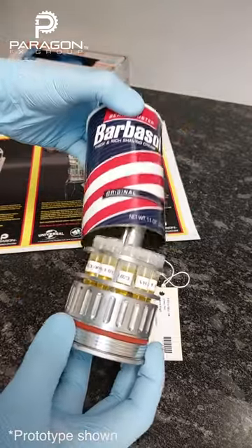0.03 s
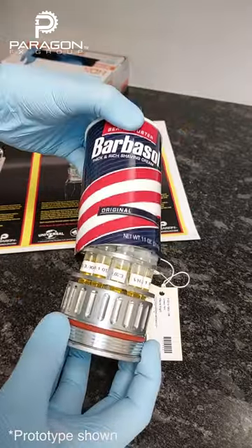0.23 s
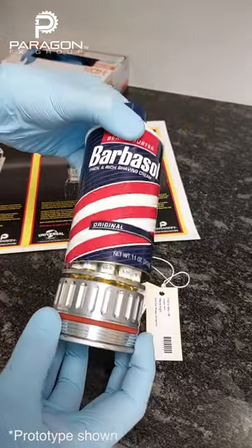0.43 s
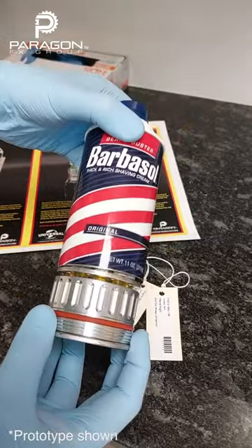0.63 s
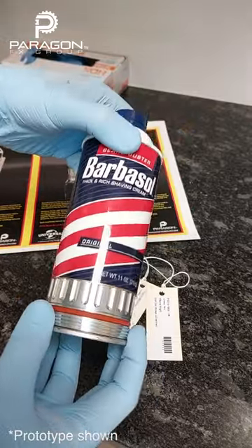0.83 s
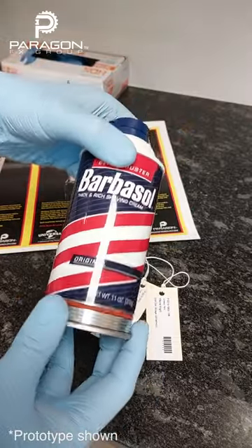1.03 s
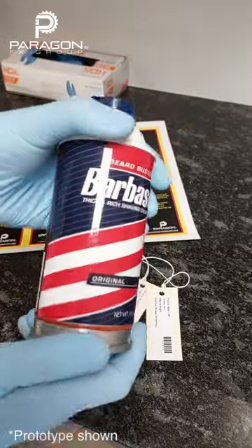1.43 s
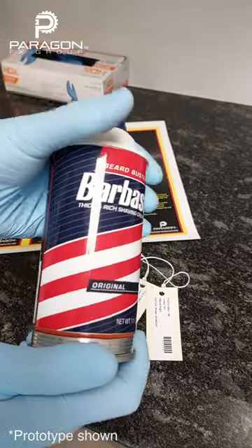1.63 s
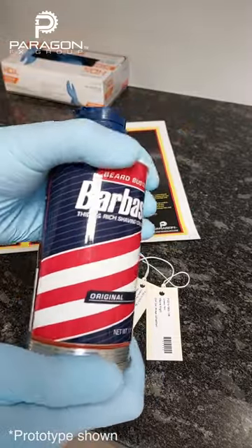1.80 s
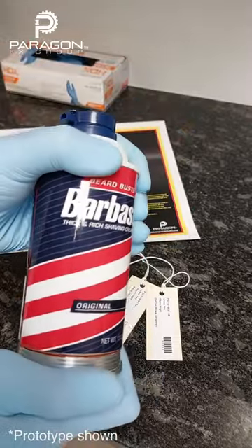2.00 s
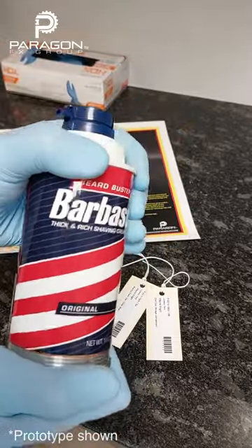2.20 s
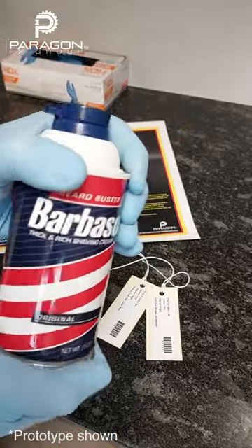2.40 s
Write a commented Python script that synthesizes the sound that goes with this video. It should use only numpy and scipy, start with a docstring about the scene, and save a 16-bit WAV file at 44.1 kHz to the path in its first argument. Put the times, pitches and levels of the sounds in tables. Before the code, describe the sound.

A thin can shell slides over a metal canister, with quick hollow knocks around 0.2 to 0.3 seconds, then light scrapes and sharp, briefly ringing clicks, strongest near 0.5 and 0.8. It seats with a click and soft thud at 1.1. Rubber gloves then rub and creak, most clearly around 1.4, sliding faintly until 2.5. Everything is close, over a small, quiet room's low hum.

```python
"""The rim of a thin can shell knocks and scrapes as gloved hands lower it over a metal canister.
Impact and friction excite the bending modes of the wall; the knocks also ring the enclosed air.
The shell seats with a soft thud, then the rubber gloves rub, creak and slide on it.
All is heard from close by, over the low hum of a small quiet room."""
import sys
import numpy as np
from scipy import signal
from scipy.fft import rfft, irfft, next_fast_len
from scipy.io import wavfile

SR = 44100
rng = np.random.default_rng(int(sys.argv[2]) if len(sys.argv) > 2 else 0)


def int16_out(signal):
    """Quantize to a 16-bit WAV file."""
    q = np.round(np.clip(np.atleast_2d(signal).T, -1, 1) * 32767)
    wavfile.write(sys.argv[1], SR, q.astype(np.int16))


N = 112454

# Bending modes of the wall. Each row: frequency in Hz, relative level in dB, T60 in seconds.
WALL_MODES = [(1753, -2, .12), (2603, -2, .13), (2666, -4, .13), (2755, -6, .1), (2972, -4, .09),
              (3555, -14, .11), (4190, -8, .1), (4410, -8, .08), (5030, -6, .08), (6086, -1, .07),
              (6195, 3, .07), (6352, -3, .07), (9700, -13, .08), (12300, -10, .07)]
# Spectrum of metal touching metal. Each row: frequency in Hz, gain in dB.
METAL_SPECTRUM = [(200, -4), (400, 4), (800, -5), (1400, 0.5), (2100, -0.5), (2650, -1), (3250, -9),
                  (3850, -10), (4400, 0.5), (5100, 9.5), (6200, 5), (7000, -3.5), (8300, -11), (9700, 0.5),
                  (12300, 5), (15500, -5)]


def undb(db):
    """Amplitude ratio of a level in decibels."""
    return 10 ** (np.asarray(db) / 20)


def unit(x):
    """Normalisation to an rms of 1."""
    return x / np.sqrt(np.mean(x ** 2))


def since(start):
    """Seconds elapsed since an onset, zero before it."""
    return np.maximum(np.arange(N) / SR - start, 0)


def band(x, lo, hi):
    """Butterworth band-pass between two frequencies in Hz."""
    return signal.sosfilt(signal.butter(3, [lo, min(hi, SR * .49)], "band", fs=SR, output="sos"), x)


def colour(x, points, power=1):
    """Minimum-phase filter through points of frequency in Hz and gain in dB."""
    size = next_fast_len(2 * N) * 2
    hz, db = np.array(points, float).T
    gain_db = np.interp(np.log(np.arange(size // 2 + 1) * SR / size + 1), np.log(hz), db) * power
    cepstrum = irfft(gain_db * np.log(10) / 20)
    cepstrum[1:size // 2] *= 2  # folding onto positive time makes the filter causal
    cepstrum[size // 2 + 1:] = 0
    return irfft(rfft(x, size) * np.exp(rfft(cepstrum)))[..., :N]


def noise():
    """A diffuse field at two points: coherent in the bass, independent in the treble."""
    mid, side = rfft(rng.standard_normal((2, N)))
    hz = np.arange(len(mid)) * SR / N
    coherence = 1 / (1 + (hz / 656) ** 2)
    spectra = mid * np.sqrt(1 + coherence) + side * np.sqrt(1 - coherence) * np.array([[1], [-1]])
    return irfft(spectra, N) / np.sqrt(2)


def wander(rate):
    """Random modulation of rms 1, interpolated between `rate` values a second."""
    return unit(np.interp(since(0) * rate, np.arange(N), rng.standard_normal(N)))


def ring(age, hz, t60):
    """Free vibration of a damped mode, falling 60 dB in t60 seconds."""
    return np.sin(2 * np.pi * hz * age) * np.exp(-np.log(1000) * age / t60)


def resonate(x, hz, width_hz):
    """Forced response of a resonator with unit gain at its centre."""
    return signal.lfilter(*signal.iirpeak(hz, hz / width_hz, fs=SR), x)


def textures(spectrum):
    """Densely overlapping modes act as coloured noise, here split into four bands."""
    # Low, middle, bright and top band. Each row: lower and upper edge in Hz.
    band_edges = [(180, 900), (900, 3900), (4100, 7500), (8800, 16500)]
    dense = colour(noise(), spectrum)
    return np.array([unit(band(dense, lo, hi)) for lo, hi in band_edges])


def friction(strokes, spectrum, roughness):
    """Sliding friction: strokes add in power, and irregular stick-slip modulates their noise."""
    bands, t = textures(spectrum), since(0)
    power = np.zeros((len(bands), N))
    for peak, rise, fall, *db in strokes:
        swell = np.exp(-((t - peak) / np.where(t < peak, rise, fall)) ** 2)
        power += undb(db)[:, None] ** 2 * swell
    slips = unit(np.exp(roughness * (wander(rate=980) + .5 * wander(rate=120))))
    return slips * np.einsum("bcn,bn->cn", bands, np.sqrt(power))


def from_left(x):
    """Path difference: sound from the left reaches the right microphone later."""
    delay_s = .00015
    left, right = x * np.ones((2, 1))
    return np.array([left, np.pad(right, (int(delay_s * SR), 0))[:N]])


def background():
    """Ambient noise: a broadband rumble and two hum tones that waver by phase modulation."""
    # Rumble spectrum. Each row: frequency in Hz, relative spectral density in dB.
    rumble_spectrum = [(20, -1), (45, -4.5), (60, 8), (110, 6.5), (160, -16), (230, -7.5), (400, -21.5),
                       (1000, -31.5), (3000, -30), (8000, -48)]
    hum = sum(undb(db) * np.sqrt(2) * np.sin(2 * np.pi * hz * since(0) + .5 * wander(rate=4.4))
              for hz, db in [(59, -81.5), (109, -71)])
    return undb(-67.5) * unit(colour(noise(), rumble_spectrum)) + hum


def reverberation(x):
    """Diffuse reflections build up, then decay exponentially, most slowly in the bass."""
    # Room decay. Each row: lower and upper band edge in Hz, T60 in seconds.
    decay_times = [(150, 900, .24), (885, 3200, 0.18), (3750, 8500, 0.2), (8600, 23500, 0.17)]
    room_db, build_s = -8.5, .0046
    t, field = since(0), noise()
    tail = sum(band(field, lo, hi) * np.exp(-np.log(1000) * t / t60) for lo, hi, t60 in decay_times)
    tail *= 1 - np.exp(-t / build_s)
    return undb(room_db) * signal.fftconvolve(x, unit(tail) / np.sqrt(N), axes=1)[:, :N]


def glove_slide():
    """Light friction: a glove sliding along the can makes soft, grainy noise."""
    # Envelope of the slide. Each row: time in seconds, level in dB.
    envelope = [(2.148, -87), (2.29, -81.5), (2.35, -74), (2.41, -71.5), (2.46, -62.5), (2.5, -65.5),
                (2.55, -66)]
    # Spectrum of the slide. Each row: frequency in Hz, gain in dB.
    spectrum = [(400, -25.5), (850, -17.5), (1250, -1), (1650, -8), (2050, 0), (2600, -20), (3500, -29.5),
                (8000, -36.5)]
    level = undb(np.interp(since(0), *np.array(envelope).T, left=-140))
    return level * unit(colour(noise(), spectrum) * np.exp(.2 * wander(rate=300)))


def glove_grip():
    """Stick-slip of rubber on metal: a broad hiss as it rubs, narrow-band creaks where it grips."""
    # Glove strokes. Each row: peak time, rise and fall in seconds, four relative band levels in dB.
    rubs = [(1.21, .008, 0.015, -106, -101, -63.5, -70), (1.32, 0.023, 0.059, -102, -81, -55.5, -57),
            (1.361, 0.0035, 0.015, -95, -65.5, -42, -56), (1.376, 0.0044, 0.0096, -67.5, -63, -44.5, -55.5),
            (1.45, 0.036, 0.029, -96, -64, -54, -60), (1.52, 0.036, 0.032, -86, -71, -66.5, -69),
            (1.625, 0.023, 0.045, -81.5, -77, -63.5, -69), (1.67, 0.024, 0.022, -92.5, -72.5, -71.5, -72),
            (1.846, .005, 0.012, -83.5, -86.5, -67, -73), (1.915, 0.074, 0.077, -80, -80.5, -75.5, -77),
            (1.959, 0.0025, .007, -92, -75, -66, -76), (2.05, 0.26, 0.11, -93.5, -86.5, -75, -77.5),
            (2.3, 0.11, 0.081, -83, -91.5, -72.5, -76), (2.47, 0.11, 0.11, -107, -76, -66.5, -73)]
    # Spectrum of rubbing rubber. Each row: frequency in Hz, gain in dB.
    rubber_spectrum = [(200, -12.5), (800, -19.5), (1200, -9), (1700, 4), (2050, 3.5), (2650, 2),
                       (3100, -3), (3700, -3.5), (4600, 2), (5400, 15), (6500, 2), (8300, -11.5),
                       (10000, -1), (12300, 1.5), (15500, -11.5)]
    # Creaks. Each row: peak time and half length in seconds, pitch in Hz, level in dB.
    creaks = [(1.361, 0.029, 2700, -69), (1.42, 0.048, 2610, -70), (1.459, 0.02, 2110, -65),
              (1.67, .018, 1960, -72.5), (1.921, 0.015, 768, -79)]
    rub_db, width_hz = -5, 550
    out = undb(rub_db) * friction(rubs, rubber_spectrum, roughness=.16)
    for peak, half_length, hz, db in creaks:
        rasp = unit(resonate(resonate(noise(), hz, width_hz), hz, width_hz))
        out += undb(db) * np.exp(-((since(0) - peak) / half_length) ** 2) * rasp
    return out


def seating_thud():
    """Cushioned impact: the shell meets its seat and excites the low modes of the canister."""
    # Bumps on the seat. Each row: start in seconds, level in dB.
    bumps = [(1.108, -46.5), (1.1273, -41), (1.142, -74), (1.162, -53)]
    # Modes of the thud. Each row: frequency in Hz, relative level in dB, T60 in seconds.
    seat_modes = [(59, -4, 0.28), (116, -6, 0.097), (204, -2, 0.053), (267, 4, 0.049), (325.6, 0, 0.089),
                  (435, -6, 0.034)]
    contact_s = .00069
    out = np.zeros(N)
    for start, db in bumps:
        age = since(start)
        thud = sum(undb(mode_db) * ring(age, hz, t60) for hz, mode_db, t60 in seat_modes)
        out += undb(db) * (1 - np.exp(-age / contact_s)) * thud
    return out


def rim_scrapes():
    """Forced vibration: friction of the rim on the canister drives the wall modes."""
    # Rim strokes. Each row: peak time, rise and fall in seconds, four relative band levels in dB.
    strokes = [(.325, 0.035, 0.019, -50, -53, -56.5, -67), (.415, 0.023, 0.028, -61, -65.5, -56, -58),
               (.45, 0.029, 0.023, -67, -65.5, -52.5, -56), (.51, 0.024, 0.016, -49.5, -48, -55, -55.5),
               (.6, 0.057, 0.13, -62, -64.5, -66.5, -74), (.645, .01, 0.025, -54.5, -55, -58.5, -65),
               (.725, 0.012, 0.02, -45.5, -51.5, -53, -56), (.78, 0.024, 0.054, -59, -57, -55, -59),
               (.845, 0.032, 0.0086, -49.5, -48, -60, -65), (.93, 0.058, 0.18, -70, -68, -69, -72.5),
               (1.05, 0.037, 0.049, -72.5, -59, -55.5, -56), (1.1, 0.037, 0.027, -62.5, -53, -50.5, -50)]
    drag_db, resonance_db = -4, 10
    drag = undb(drag_db) * friction(strokes, METAL_SPECTRUM, roughness=.23)
    singing = sum(undb(db) * resonate(drag, hz, width_hz=30) for hz, db, _ in WALL_MODES)
    return drag + undb(resonance_db) * singing


def hollow_knocks():
    """Cavity resonance: each knock rings the air in the shell, on a note that starts sharp and settles."""
    # Knocks. Each row: start in seconds, settled pitch in Hz, level in dB.
    knocks = [(0.2196, 529, -35.5), (.2535, 496, -29.5), (.282, 540, -36), (.300, 491.3, -33),
              (.3215, 486, -34), (.468, 388.5, -33), (.511, 361, -40.5), (.719, 417, -41.5),
              (0.7258, 367, -34.5), (.812, 455, -41)]
    # Modes of the enclosed air. Each row: ratio to the pitch, relative level in dB.
    air_modes = [(1, -2), (1.39, -16), (1.68, -19.5), (.47, -18)]
    attack_s, t60_s = .003, .095
    sharp_fraction, settle_s = .033, .016
    out = np.zeros(N)
    for start, hz, db in knocks:
        age = since(start)
        warped_age = age + sharp_fraction * settle_s * (1 - np.exp(-age / settle_s))
        note = sum(undb(mode_db) * ring(warped_age, hz * ratio, t60_s) for ratio, mode_db in air_modes)
        out += undb(db) * np.sqrt(2) * (1 - np.exp(-age / attack_s)) * note
    return out


def rim_clicks():
    """Impulse excitation: each rim contact gives a short crack and leaves the wall ringing freely."""
    # Rim contacts. Each row: start in seconds, four relative band levels in dB.
    contacts = [(.219, -55.5, -54.5, -45.5, -50.5), (.253, -46, -55.5, -45.5, -59),
                (.283, -56.5, -48, -36, -37), (0.304, -74, -49.5, -43, -48), (.309, -57.5, -49, -42, -42),
                (0.4673, -33, -27, -23, -31), (0.4719, -58, -33.5, -44, -41), (0.639, -58, -71, -46, -64),
                (0.8102, -45, -47.5, -35, -41.5), (0.8131, -33.5, -37, -30.5, -42),
                (0.8158, -66, -37, -53, -43), (1.108, -45, -41.5, -34, -41)]
    crack_db, crack_decay_s, wall_db = -2.5, .0058, -12
    bands = textures(METAL_SPECTRUM)
    envelopes, impulses = np.zeros((len(bands), N)), np.zeros(N)
    for start, *db in contacts:
        age = since(start)
        envelopes += undb(db)[:, None] * (age > 0) * np.exp(-age / crack_decay_s)
        impulses[int(start * SR)] = undb(db[1])  # the middle band sets the strength of the blow
    cracks = undb(crack_db) * np.einsum("bcn,bn->cn", bands, envelopes)
    wall_response = sum(undb(db + wall_db) * ring(since(0), hz, t60) for hz, db, t60 in WALL_MODES)
    return cracks + signal.fftconvolve(impulses, wall_response)[:N]


def scene():
    """Superposition of the direct sound, its reverberation and the ambient noise."""
    surface = rim_clicks() + rim_scrapes() + glove_grip() + glove_slide()
    hollow = from_left(hollow_knocks() + seating_thud())
    return surface + hollow + reverberation(surface + undb(-1.5) * hollow) + from_left(background())


def record(dry):
    """Transduction: two microphone ports of unequal response add faint self-noise; the top is cut."""
    # Difference between the ports. Each row: frequency in Hz, left minus right in dB.
    port_difference = [(60, 8), (110, 9), (220, 3), (450, -2), (1300, 1.5), (2600, -3.5), (3800, 3),
                       (4600, -11), (5500, -10), (6200, -14.5), (6900, 2.5), (7900, 0), (9500, 2),
                       (11000, -5), (13000, -10), (15000, 6)]
    # Self-noise. Each row: frequency in Hz, relative spectral density in dB.
    hiss_spectrum = [(1000, 1), (4000, -17), (8300, -3), (12000, -2), (16000, -4)]
    hiss_db, cutoff_hz = -82.5, 16100
    heard = np.array([colour(dry[0], port_difference, 1 / 2), colour(dry[1], port_difference, -1 / 2)])
    heard += undb(hiss_db) * unit(colour(noise(), hiss_spectrum))
    return signal.sosfilt(signal.ellip(10, .2, 70, cutoff_hz, fs=SR, output="sos"), heard)


dry = scene()
out = record(dry)
int16_out(out)
```